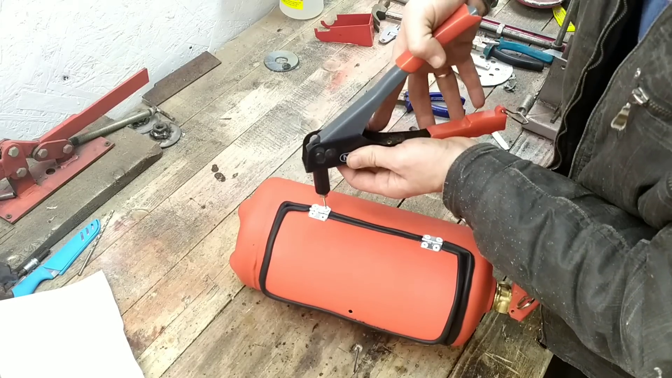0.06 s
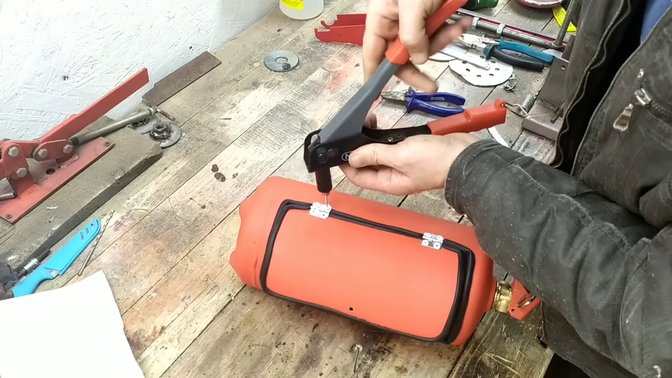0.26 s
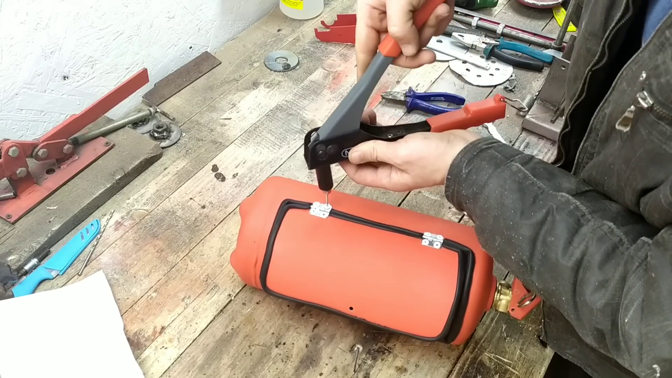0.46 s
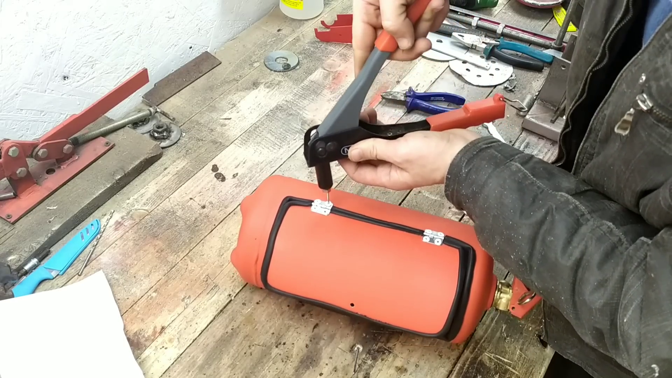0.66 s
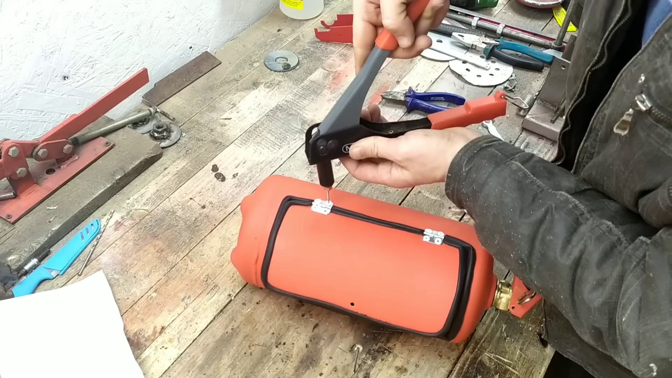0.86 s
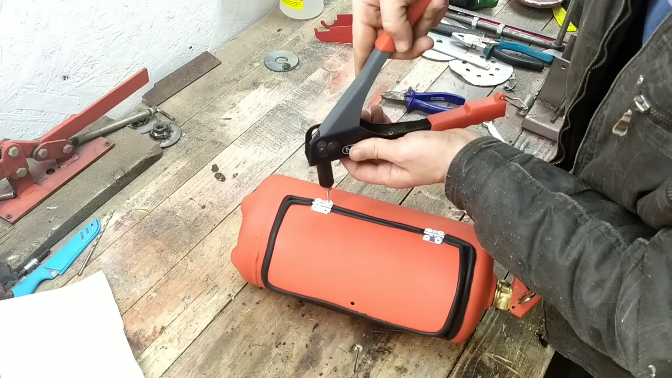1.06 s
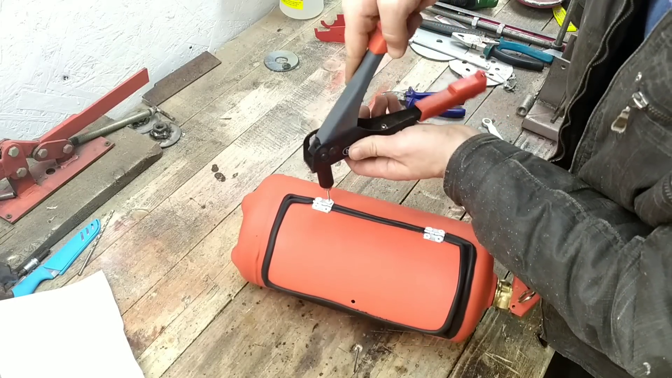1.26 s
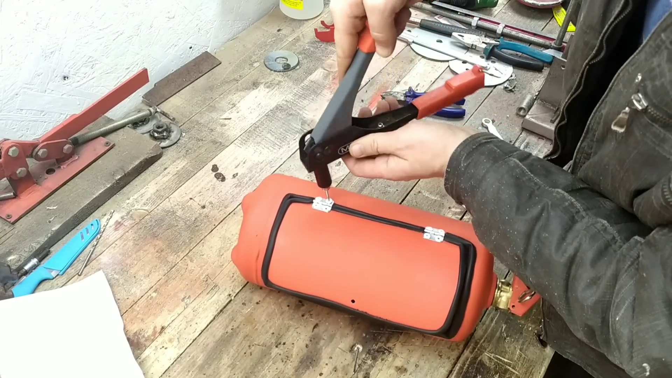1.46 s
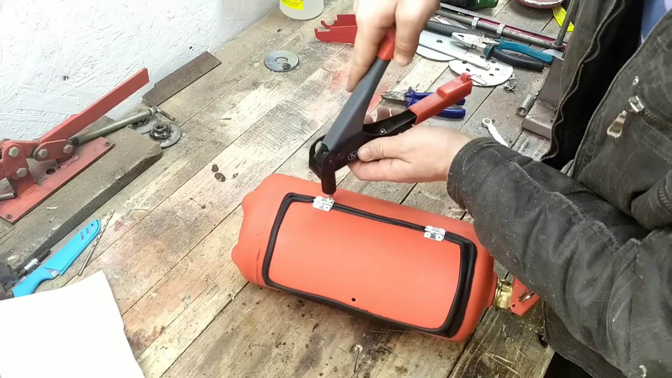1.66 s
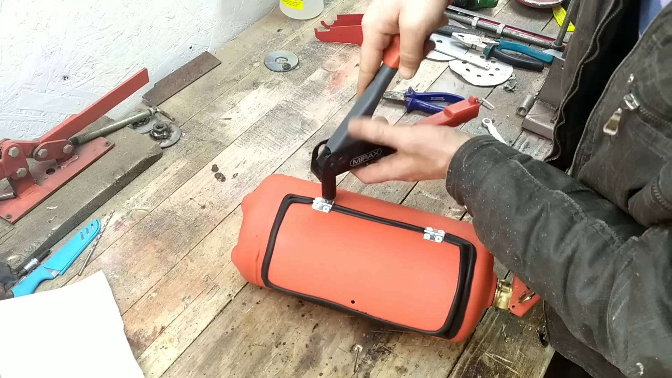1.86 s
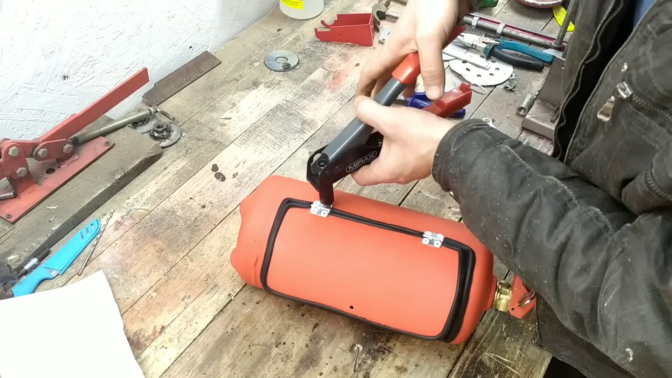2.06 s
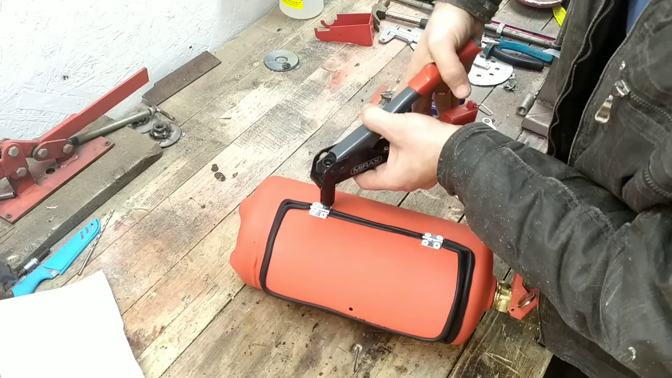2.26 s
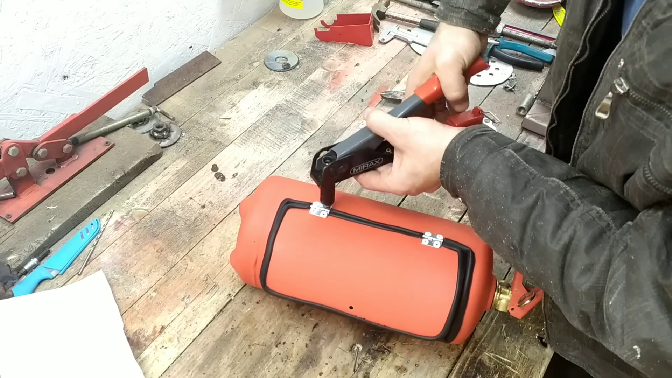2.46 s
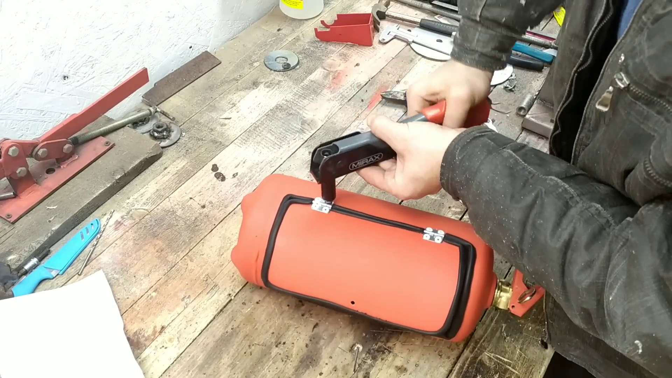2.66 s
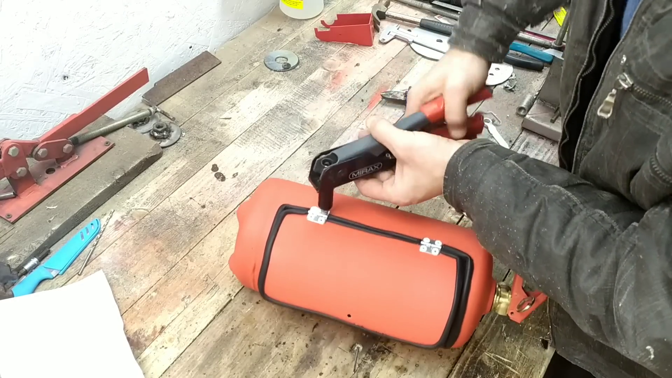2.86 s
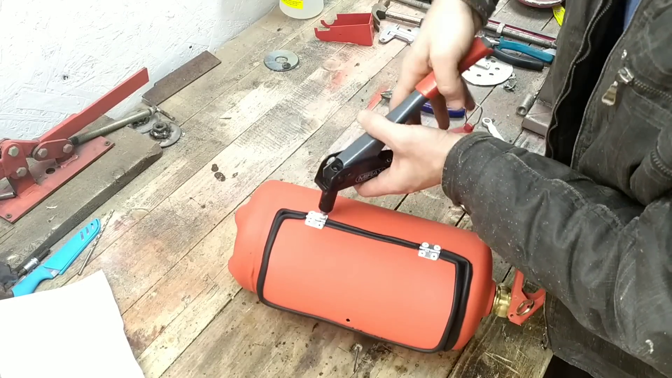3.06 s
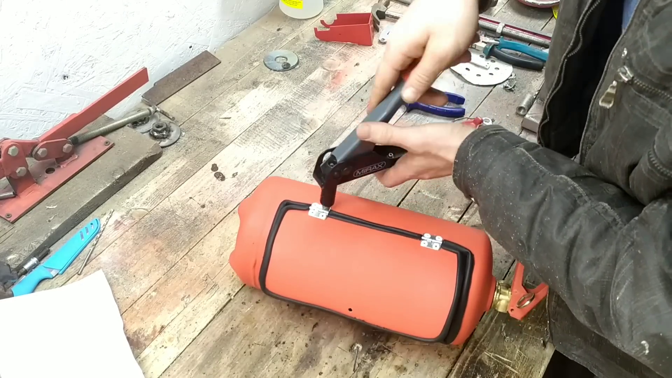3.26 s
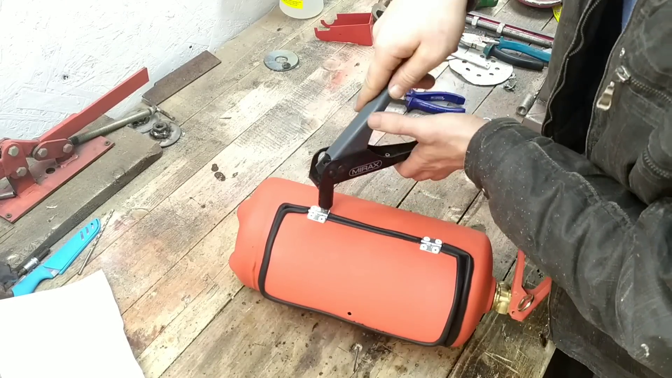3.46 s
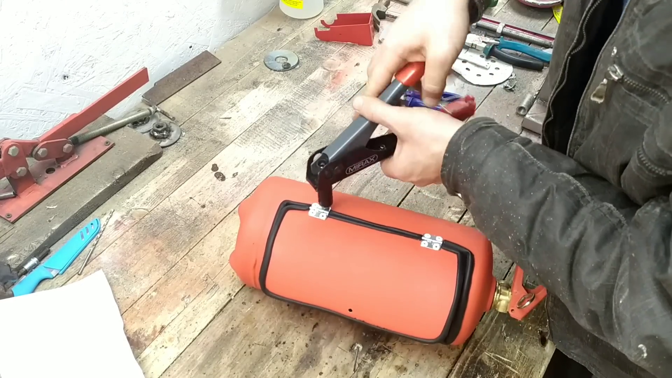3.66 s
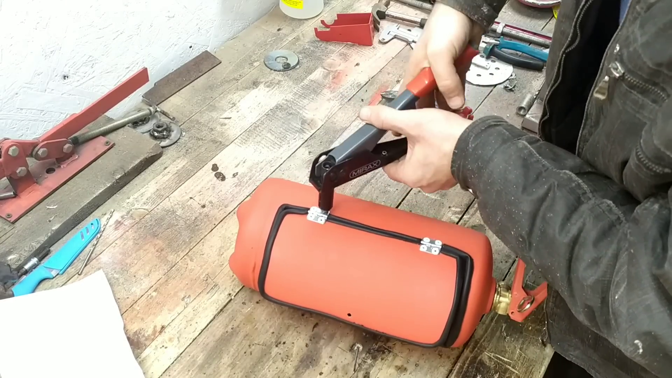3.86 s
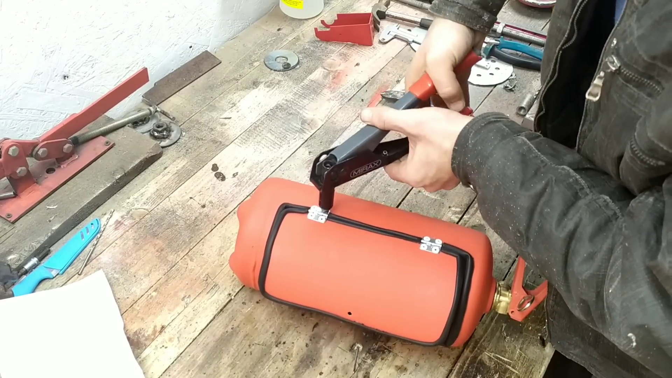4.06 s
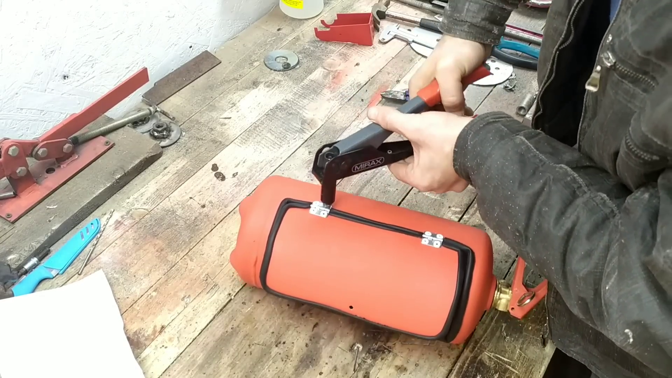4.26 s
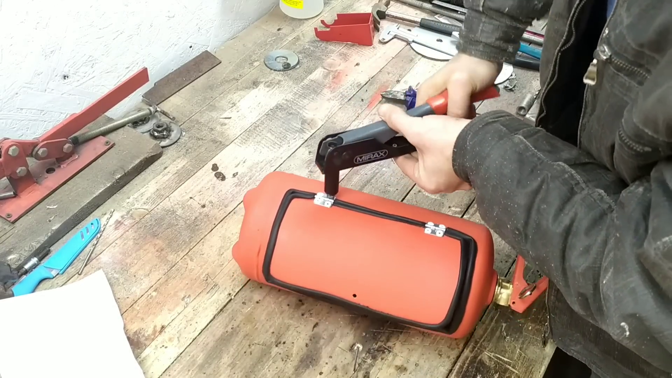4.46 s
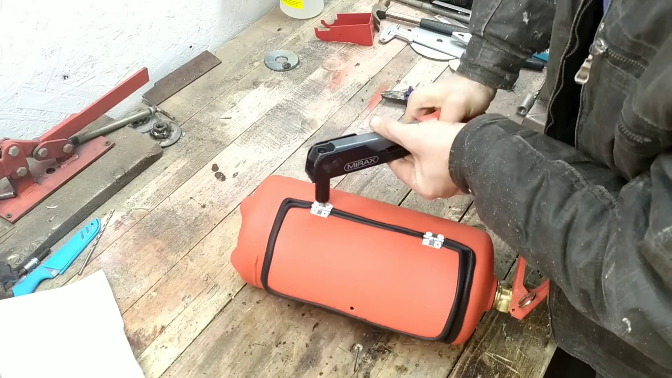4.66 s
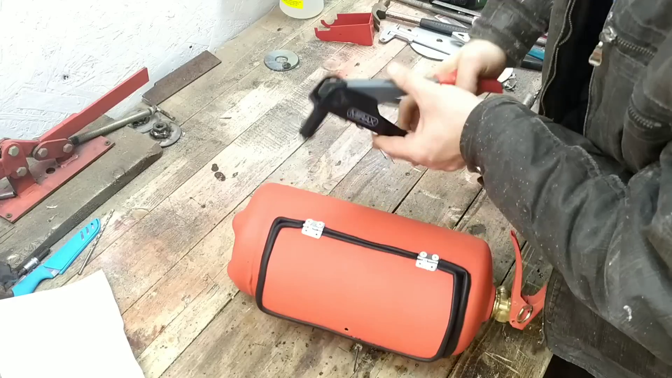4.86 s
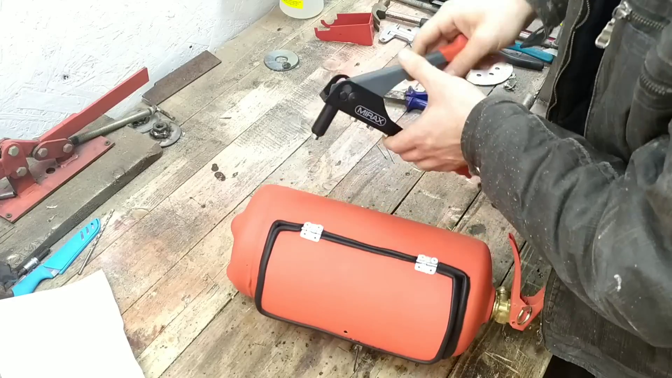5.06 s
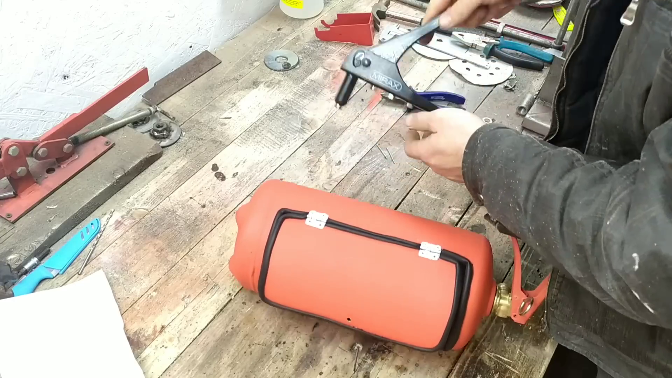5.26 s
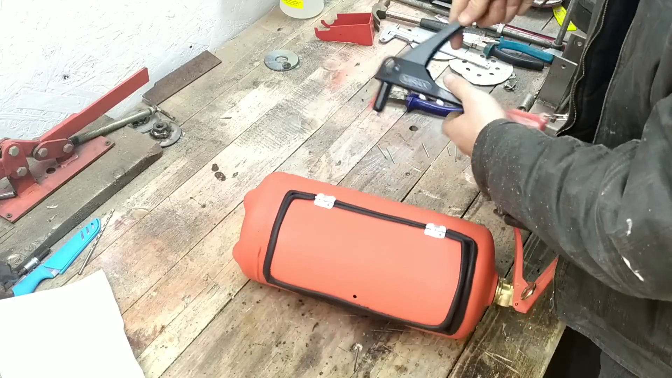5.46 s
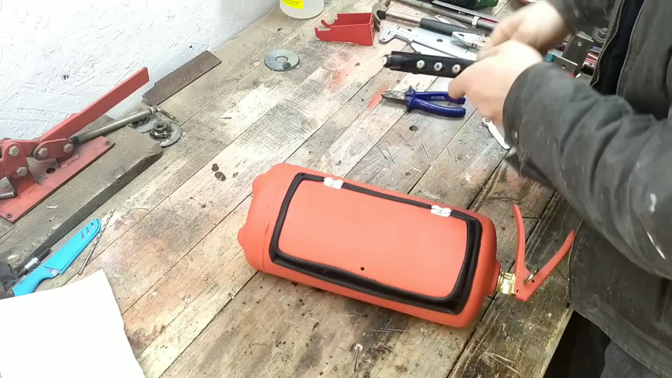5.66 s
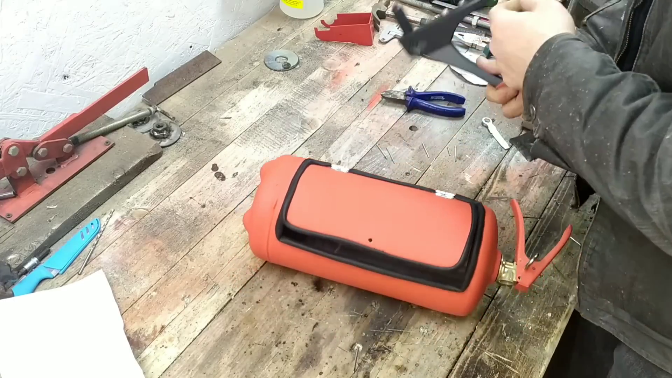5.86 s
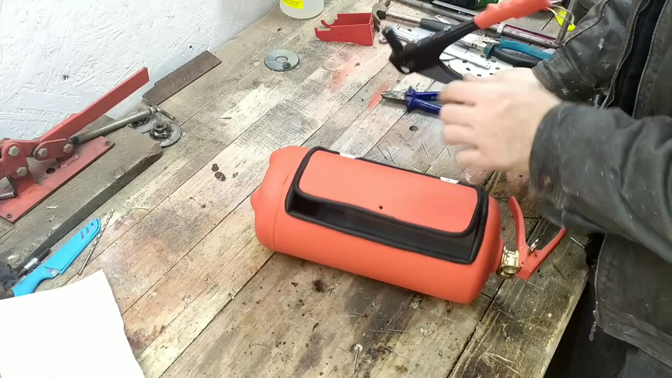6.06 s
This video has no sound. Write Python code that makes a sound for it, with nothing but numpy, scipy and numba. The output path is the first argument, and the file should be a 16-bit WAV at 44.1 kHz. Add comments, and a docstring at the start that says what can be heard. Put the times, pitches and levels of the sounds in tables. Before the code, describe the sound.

A hand rivet gun clicks and scrapes against a hollow steel cylinder on a wooden bench, then a violent metallic snap breaks the mandrel.

```python
"""Hand rivet gun on a steel cylinder

A hand rivet gun is set on a hinge of an empty steel cylinder on a wooden bench and squeezed until the mandrel snaps.
Clicks and short slides are decaying bursts of ticks that excite resonances of gun, cylinder and wood. Stick-slip grains
scrape the cylinder, impulses boom in two bench modes, shaped noise makes the jacket, loose tools and air.
A small hard workshop rings after clicks and scrapes; the recorder's limiter holds the snap down."""
import sys
import numpy as np
from scipy import signal
from scipy.fft import rfft, irfft
from scipy.io import wavfile
from scipy.ndimage import uniform_filter1d
from numba import njit

SR = 44100
rng = np.random.default_rng(int(sys.argv[2]) if len(sys.argv) > 2 else 0)


def dump(signal):
    """Clip the signal to [-1, 1] and save it as 16-bit WAV at the path in sys.argv[1]."""
    limited = np.clip(np.atleast_2d(signal).T, -1, 1)
    pcm = np.round(limited * 32767).astype(np.int16)
    wavfile.write(sys.argv[1], SR, pcm)


N = 269010
T = np.arange(N) / SR

# pushes on the bench: start_s, level_db, upper_mode_share (0-1), tool_clatter_db
PUSHES = [(0.845, -47, 0.4, -68), (0.996, -44, 0.27, -85), (1.281, -40, 0.22, -71), (1.342, -51.5, 0, -96),
          (1.453, -57, 0.3, -108), (1.782, -23.5, 0.71, -46.5), (2.119, -45, 0.14, -91),
          (2.712, -40, 0.78, -56), (2.924, -38, 0.5, -57.5), (2.996, -40, 1, -76),
          (3.335, -28.5, 0.5, -51.5), (3.515, -49, 0.55, -65), (3.622, -50.5, .26, -65),
          (4.628, -21.5, 0.6, -19), (4.747, -29.5, 0.35, -40), (4.892, -47.5, 0.8, -46.5),
          (5.09, -49.5, 0.3, -71), (5.79, -56, 0.4, -75)]
# resonances of the empty cylinder: centre_hz, width_hz, level_db (relative)
CYLINDER = [(335, 13.3, 0), (429, 5.7, -2), (845, 80, -6), (1010.3, 72, 0.5), (1435, 82, -8.5),
            (1633, 120, -8.5), (2340, 31, -25)]
# resonances of the wood: centre_hz, width_hz, level_db (relative)
WOOD = [(185, 34, -3.5), (236.6, 13, -8), (293.3, 16, 9.5), (372, 190, -5.5), (510, 50.5, -2.5),
        (674, 37, -9.5)]


def undb(db):
    """Amplitude factor of a level in dB."""
    return 10 ** (np.asarray(db) / 20)


def unit(x):
    """Scale to rms 1 over all samples."""
    return x / np.sqrt(np.mean(x ** 2))


def ring(x, centre_hz, width_hz):
    """Resonance with gain 1 at its centre."""
    b, a = signal.iirpeak(min(centre_hz, .45 * SR), centre_hz / width_hz, SR)
    return signal.lfilter(b, a, x)


def resonate(x, modes):
    """Sum of one object's modes with alternating signs."""
    return sum((-1) ** k * undb(level_db) * ring(x, centre_hz, width_hz)
               for k, (centre_hz, width_hz, level_db) in enumerate(modes))


def body(x, modes):
    """Resonances of one object, scaled so that a unit blow peaks near 1."""
    blow = np.r_[1., np.zeros(2000)]
    return resonate(x, modes) / np.abs(resonate(blow, modes)).max()


def coloured(spectrum, channels=2):
    """Unrelated noises with the given spectrum, rms 1."""
    hz, level_db = np.transpose(spectrum)
    bin_hz = np.arange(N // 2 + 1) * SR / N
    gain = undb(np.interp(np.log(bin_hz + 1), np.log(hz), level_db))
    return unit(irfft(rfft(rng.standard_normal((channels, N))) * gain, N))


def walk(rate_hz):
    """Slow random wander, rms 1: noise averaged twice over 1 / rate_hz."""
    window = int(SR / rate_hz)
    once = uniform_filter1d(rng.standard_normal(N), window)
    return unit(uniform_filter1d(once, window))


def pair(noise, alike):
    """Left and right from two noises, with correlation `alike`."""
    alike = np.clip(alike, 0, 1)
    middle = np.sqrt((1 + alike) / 2) * noise[0]
    side = np.sqrt((1 - alike) / 2) * noise[1]
    return middle + side * np.array([[1], [-1]])


def swells(start_s, held_s, level_db, slopes_db_per_s):
    """Gain of events that rise, hold and fall at steady dB per second; their powers add."""
    rise, fall = slopes_db_per_s
    power = 0
    for start, held, level in np.broadcast(start_s, held_s, level_db):
        before_db = np.maximum(rise * (start - T), 0)
        after_db = np.maximum(fall * (T - start - held), 0)
        power = power + undb(level - before_db - after_db) ** 2
    return np.sqrt(power)


def rustle():
    """Broad grainy noise: sleeves, jacket swishes, and loose tools shaken by the pushes."""
    # sleeves moving all the time: time_s, level_db
    sleeve_levels = [(0, -72.5), (.3, -68.5), (1.2, -67.5), (1.6, -67.5), (1.95, -60.5), (2.3, -66.5),
                     (3.2, -64), (3.7, -61.5), (4.3, -68.5), (5.0, -67.5), (5.3, -67), (6.1, -59)]
    # swishes of the jacket: start_s, held_s, level_db
    swishes = [(4.5, 0.022, -59), (5.085, 0.11, -58.5), (5.346, .06, -58), (5.49, 0.0057, -50),
               (5.625, 0.045, -50), (5.799, 0.039, -59.5), (5.89, 0.0068, -60.5), (5.966, 0.095, -55.5)]
    # noise spectrum: frequency_hz, density_db (relative, per Hz)
    cloth = [(88, -13), (150, -6.5), (249, -3.5), (328, -12.5), (475, -5.5), (1450, -9.5), (3490, -8),
             (9820, -9), (16000, -20.5)]
    swish_db_per_s, clatter_db_per_s = (307, 189), (593.5, 154)  # rise, fall
    slow_flicker_db, fast_flicker_db = 1., 1.24  # rms

    push_s, _, _, clatter_db = np.transpose(PUSHES)
    sleeve_gain = undb(np.interp(T, *np.transpose(sleeve_levels)))
    swish_gain = swells(*np.transpose(swishes), swish_db_per_s)
    clatter_gain = swells(push_s, 0, clatter_db, clatter_db_per_s)
    flicker = undb(slow_flicker_db * walk(16) + fast_flicker_db * walk(320))
    return (sleeve_gain + swish_gain + clatter_gain) * flicker * pair(coloured(cloth), 0.017)


def air():
    """Steady background: shaped noise, nearly unrelated left and right."""
    # noise spectrum: frequency_hz, density_db (relative, per Hz)
    air_spectrum = [(15, -26.5), (25, -5.5), (76, 9.5), (263, -19), (677, -24), (1130, -25), (3340, -15),
                    (4250, -28), (10100, -25.5), (16000, -31.5)]
    air_db = -73
    return undb(air_db) * pair(coloured(air_spectrum), 0.16)


def bench():
    """Two low bending modes of the bench top, struck by pushes; it trembles around each and lightly all the time."""
    # modes of the bench top, lower then upper: centre_hz, width_hz
    bench_modes = [(63, 4.7), (81, 10.8)]
    rest_tremble_db = -66.5
    aftershake_db, aftershake_lag_s = -17.5, 0.04  # relative to the push; delay of the peak
    aftershake_db_per_s = (156, 61.5)  # rise, fall

    push_s, push_db, upper_share, _ = np.transpose(PUSHES)
    upper_share = np.clip(upper_share, 0, 1)
    aftershake = swells(push_s + aftershake_lag_s, 0, push_db + aftershake_db, aftershake_db_per_s)
    tremble_gain = undb(rest_tremble_db) + aftershake
    out = 0
    for (hz, width_hz), share in zip(bench_modes, (1 - upper_share, upper_share)):
        force = np.zeros(N)
        # undo the resonator's bandwidth-dependent impulse height
        force[(push_s * SR).astype(int)] = undb(push_db) * share * SR / (np.pi * width_hz)
        boom = ring(ring(force, hz, width_hz), hz, 56)  # second, wider resonance softens the onset
        tremble = tremble_gain * unit(ring(rng.standard_normal(N), hz, width_hz))
        out = out + boom + tremble
    return out


def clicks():
    """Each click or short slide is a rattle, sharp or slowly building, that rings gun, cylinder and wood."""
    # clicks and slides of the gun, the loudest being the mandrel breaking:
    # start_s, rattle_level_db, band_centre_hz, build_up_s, rattle_length_s, then relative to the rattle:
    # ping_db (struck part), top_treble_db, gun_steel_db, cylinder_ring_db, wood_knock_db
    gun_clicks = [(0.1333, -30, 3570, 0.00019, 0.0094, 12, -21, -21, -53, -36.5),
                  (0.596, -43, 8300, 0.012, 0.077, 8, -3, -35, -17, -50),
                  (0.782, -46, 8540, .012, 0.069, 2, -7, -38, -17, -17.5),
                  (0.819, -41.5, 4930, 0.0082, .016, 4, -7, -38, -16, -14.5),
                  (0.9173, -50, 4800, 0.0023, 0.037, 4, -21, -40, -16, -16),
                  (0.9812, -40.5, 4300, 0.0004, 0.031, 16.5, 6, -40, -15.5, -28),
                  (1.259, -53, 1970, 0.0071, 0.026, 0, -21, -36, -13, -17),
                  (1.668, -55, 1700, 0, 0.022, 0, -2, -40, -4, -35),
                  (1.774, -26, 2920, 0, 0.024, -1, -25, -35, -18, -19),
                  (2.079, -61, 2160, 0.0038, 0.019, 0, -21, -40, -8, -2),
                  (2.296, -58.5, 8700, 0.0011, .022, 0, -3, -40, -14, -28),
                  (2.6985, -42.5, 3500, 0.0013, 0.044, 6.5, -11, -37, -19.5, -20.5),
                  (2.833, -53, 3380, 0, 0.01, 2, -36, -40, -16, -24),
                  (2.9098, -39.5, 5300, 0.0012, 0.015, 7, -28, -44, -19, -22.5),
                  (2.9887, -36, 3400, 0.0015, .021, 5, -38, -53, -22, -17),
                  (3.053, -45.5, 2930, 0.0023, 0.026, 10.5, -6, -47, -35, -29),
                  (3.2424, -35.5, 2240, 0.0032, 0.046, -2, -21, -51, -33, -43),
                  (3.33, -25, 7940, 0.0022, 0.017, 4, -18, -33, -22.5, -19),
                  (3.614, -56, 3480, 0.0034, 0.016, 0, -17, -40, -7, -28),
                  (3.7285, -29, 7250, 0.0039, 0.0096, 9, -27, -40, -39, -34),
                  (3.861, -44.5, 2230, 0, 0.013, 5, -36, -40, -25, -26),
                  (4.16, -55, 3100, 0.0034, 0.032, 12, -21, -45, -24, -32),
                  (4.299, -56.5, 2800, 0.0015, 0.018, -2, -15, -46, -22, -34),
                  (4.577, 10, 6155, 0.006, 0.027, 9, -33, -25, -29.5, -33),
                  (4.7425, -21, 2240, 0, 0.028, -1.5, -34, -53, -20, -20.5),
                  (4.883, -29.5, 3560, 0.0044, 0.056, 2.5, -10.5, -57, -35, -59),
                  (5.477, -45.5, 5730, 0.00035, 0.034, 4, -19, -35, -31, -27.5)]
    # resonances of the gun's steel: centre_hz, width_hz, level_db (relative)
    gun_modes = [(2430, 250, -7), (3503, 9.6, 3), (3630, 60, -2.5), (4540, 40, -7.5), (6250, 6.5, -4),
                 (6364, 150, 9.5), (6970, 120, -5.5), (8010, 100, -7), (10500, 170, -21.5)]
    ping_width_hz, grit_db = 110, 2.5  # grit: spread of tick levels
    gun_pan_db = 2.05  # left minus right

    metal, steel, hollow, knock = np.zeros((4, N))
    t = T[:6000]
    for (start_s, level_db, hz, build_s, length_s,
         ping_db, top_db, steel_db, ring_db, knock_db) in gun_clicks:
        at = slice(int(start_s * SR), int(start_s * SR) + len(t))
        tick_db = grit_db * (rng.exponential(size=len(t)) - 1.5)
        ticks = rng.standard_normal(len(t)) * undb(tick_db)
        ticks[0] = 5.9  # fixed first tick, strong only where the build-up is short
        build_up = np.minimum((t + 1 / SR) / max(build_s, 1 / SR), 1)
        decay = np.exp(-3 * t / max(length_s, .001))
        rattle = undb(level_db) * ticks * build_up * decay
        metal[at] += ring(rattle, hz, 1.65 * hz)
        metal[at] += undb(ping_db) * ring(rattle, hz, ping_width_hz)
        metal[at] += undb(top_db) * ring(rattle, 8800, 6100)
        steel[at] += undb(steel_db) * rattle
        hollow[at] += undb(ring_db) * rattle
        knock[at] += undb(knock_db) * rattle
    gun = metal + body(steel, gun_modes)
    pan = undb(np.array([[.5], [-.5]]) * gun_pan_db)
    return pan * gun + body(hollow, CYLINDER) + body(knock, WOOD)


def scrape():
    """Stick and slip of the nose: uneven grains into the cylinder wall, and the cylinder rocking on the wood."""
    # strokes of the nose on the hinge: start_s, held_s, cylinder_scrape_db, wood_rocking_db
    strokes = [(.43, 0.023, -100, -77), (0.597, 0.051, -65, -69), (.73, 0.012, -70, -63.5),
               (0.793, 0.017, -56.5, -88), (.985, 0.0055, -72, -84), (1.04, 0.048, -100, -62),
               (1.263, 0.065, -65, -60.5), (1.647, 0.14, -51.5, -64), (1.86, 0.047, -65.5, -51),
               (2.085, 0.014, -63.5, -77), (2.295, 0.011, -79, -64), (2.41, 0.36, -82, -74.5),
               (2.7, 0.019, -70.5, -60), (2.88, 0.13, -75, -63), (3.0, 0.049, -65.5, -66),
               (3.28, 0.13, -65, -76), (3.44, 0.12, -92, -68.5), (3.719, 0.022, -59.5, -55),
               (3.83, 0.07, -86, -67.5), (4.19, 0.016, -85, -64.5), (4.27, 0.034, -71, -67.5),
               (4.36, 0.11, -85, -65)]
    stroke_db_per_s = (516, 205)  # rise, fall

    start_s, held_s, scrape_db, rock_db = np.transpose(strokes)
    grain_db = 2.5 * rng.exponential(size=(2, N)) + 2.5 * walk(60)
    grains = rng.standard_normal((2, N)) * undb(grain_db)
    wall = swells(start_s, held_s, scrape_db, stroke_db_per_s) * unit(body(grains[0], CYLINDER))
    rocking = swells(start_s, held_s, rock_db, stroke_db_per_s) * unit(body(grains[1], WOOD))
    return wall + rocking


def workshop(x):
    """Dense decaying noise echoes, each band with its own decay time, different ones at each ear."""
    # reverberation by band: centre_hz, t60_s
    room_bands = [(200, 0.27), (800, 0.23), (3000, 0.28), (8000, 0.21), (14000, 0.26)]
    echo_db, onset_s = -34, 0.0053

    t = T[:SR // 2]
    echoes = 0
    for hz, t60_s in room_bands:
        noise = rng.standard_normal((2, len(t)))
        band = unit(ring(ring(noise, hz, 1.51 * hz), hz, 1.51 * hz))
        echoes = echoes + band * np.sqrt(hz / 3000) * undb(-60 * t / t60_s)
    echoes = echoes * np.clip(t / onset_s, 0, 1)
    # long waves reach both microphones more alike
    apart = (echoes[0] - echoes[1]) / 2
    echoes = echoes - 0.58 * ring(apart, 270, 690) * np.array([[1], [-1]])
    return signal.fftconvolve(x, undb(echo_db) * echoes, axes=1)[:, :N]


def scene():
    """Gun and cylinder with their echoes, over rustle, air and bench set slightly left."""
    surroundings = rustle() + air() + bench()
    near = clicks() + scrape()
    pan = undb([[.6], [-.6]])
    return near + workshop(near) + pan * surroundings


@njit
def limit(x, top, release):
    """Gain drops at once when a peak passes the top and recovers as the peak envelope decays."""
    y, envelope = np.empty_like(x), 0.
    for i in range(x.shape[1]):
        envelope = max(abs(x[0, i]), abs(x[1, i]), envelope * release)
        y[:, i] = x[:, i] * min(1., top / (envelope + 1e-9))
    return y


def record(dry):
    """A dip in the microphone's response, the limiter, the top cut."""
    # microphone dip: centre_hz, width_hz, depth (0-1)
    dip_hz, dip_width_hz, dip_depth = (4150, 1000, 0.29)
    limit_db, release_s, top_hz = -2.0, 0.00069, 16000

    dipped = dry - dip_depth * ring(dry, dip_hz, dip_width_hz)
    held = limit(dipped, undb(limit_db), np.exp(-1 / (release_s * SR)))
    top_cut = signal.ellip(8, .2, 70, top_hz, fs=SR, output="sos")
    return signal.sosfilt(top_cut, held)


dry = scene()
out = record(dry)
dump(out)
```